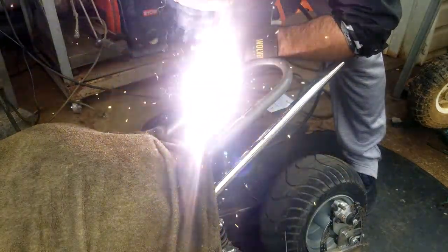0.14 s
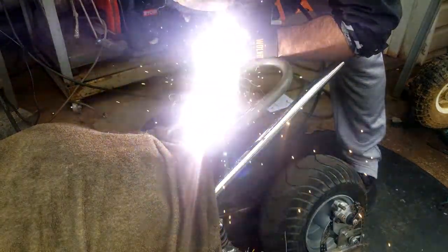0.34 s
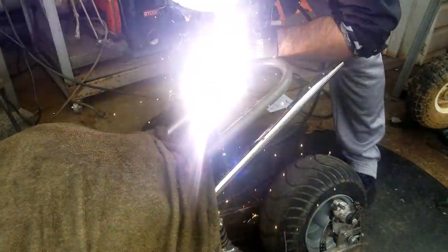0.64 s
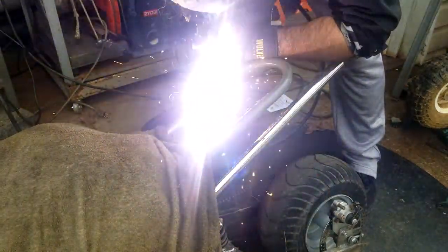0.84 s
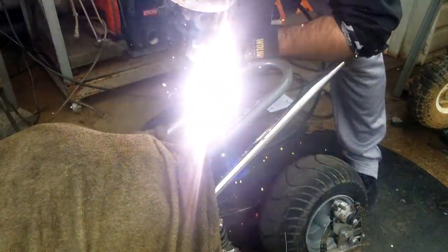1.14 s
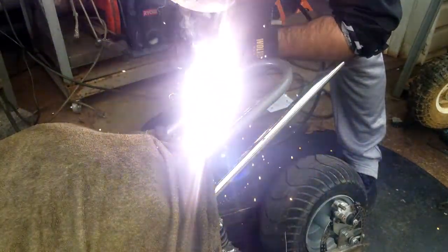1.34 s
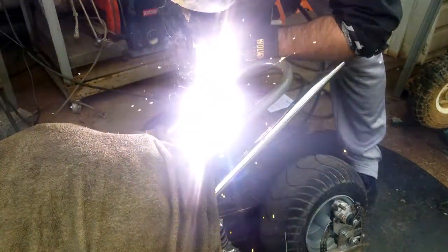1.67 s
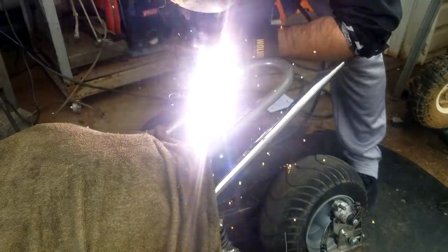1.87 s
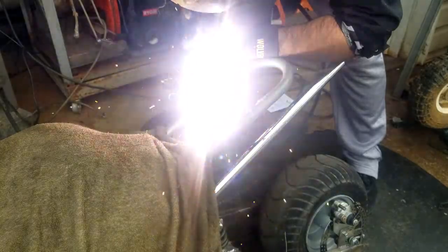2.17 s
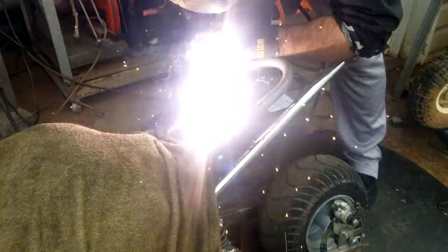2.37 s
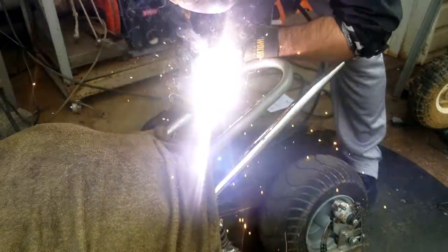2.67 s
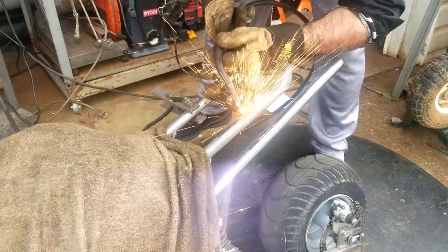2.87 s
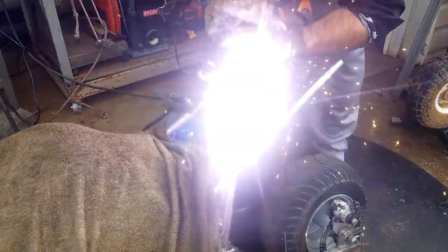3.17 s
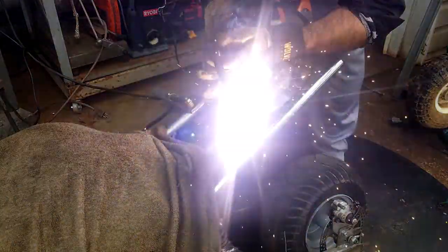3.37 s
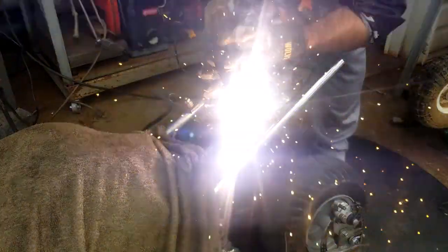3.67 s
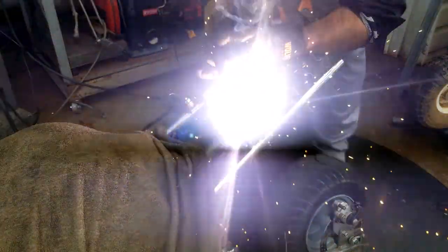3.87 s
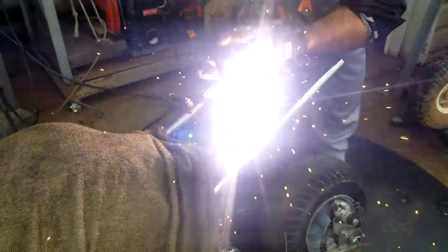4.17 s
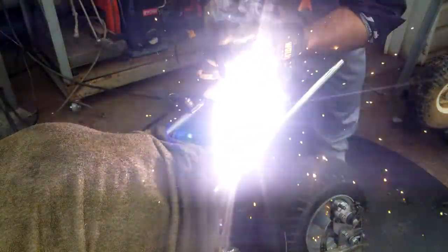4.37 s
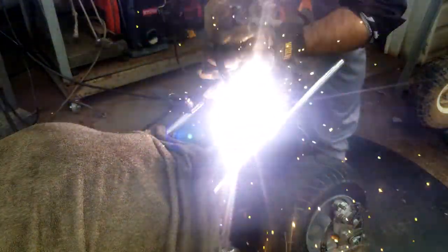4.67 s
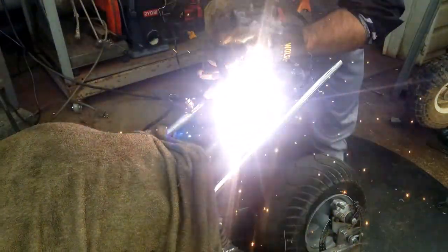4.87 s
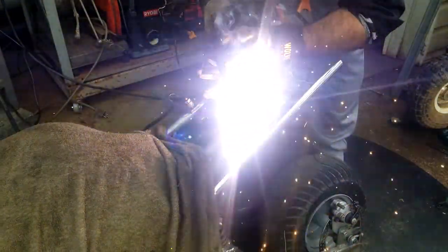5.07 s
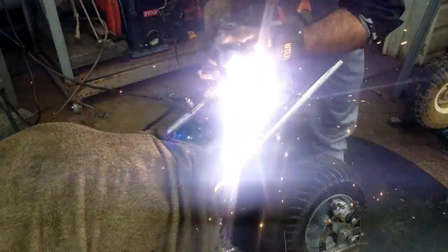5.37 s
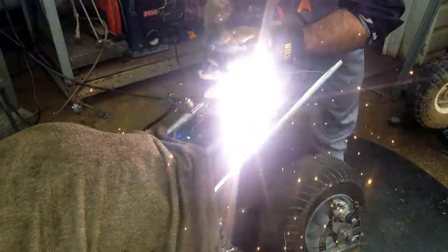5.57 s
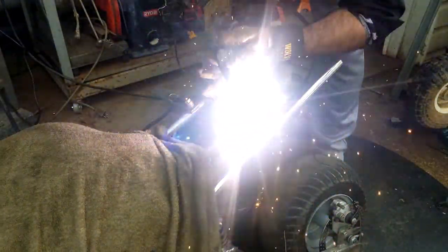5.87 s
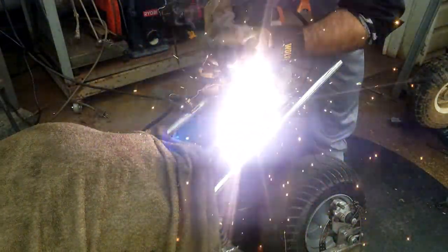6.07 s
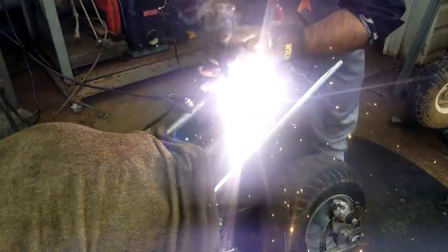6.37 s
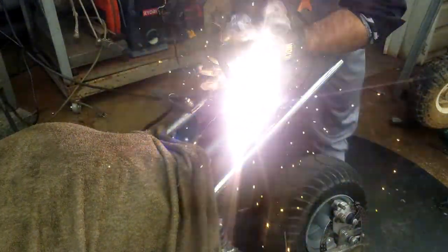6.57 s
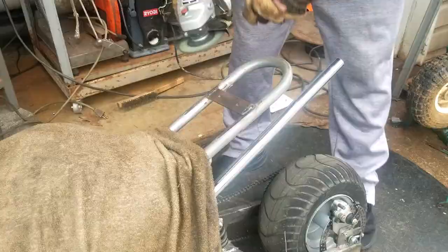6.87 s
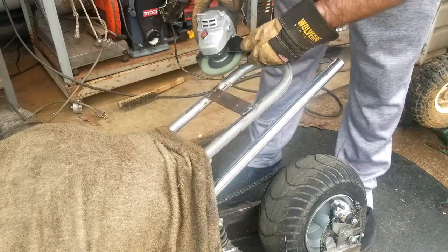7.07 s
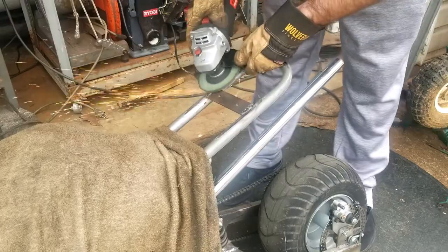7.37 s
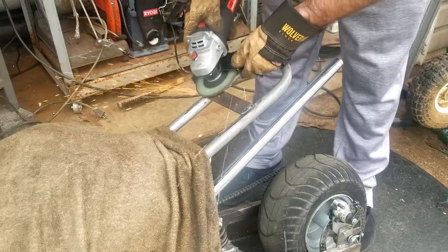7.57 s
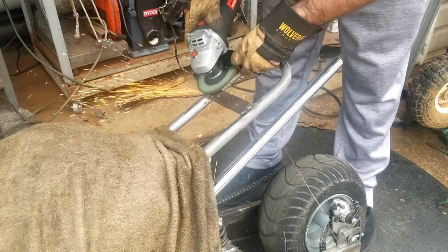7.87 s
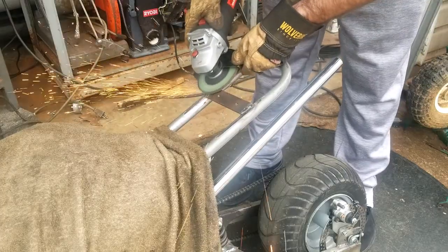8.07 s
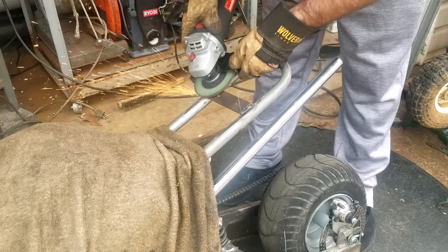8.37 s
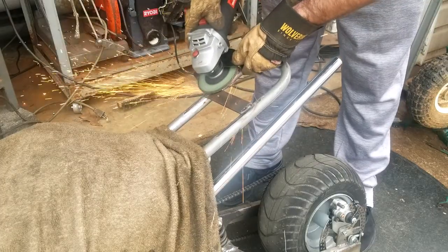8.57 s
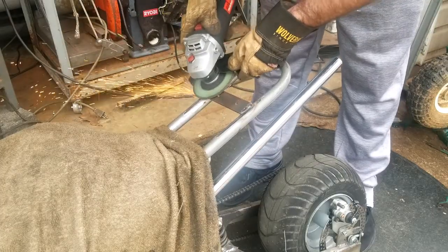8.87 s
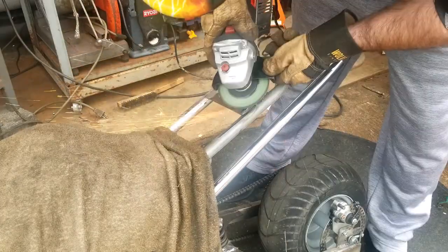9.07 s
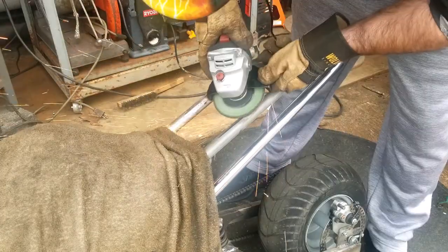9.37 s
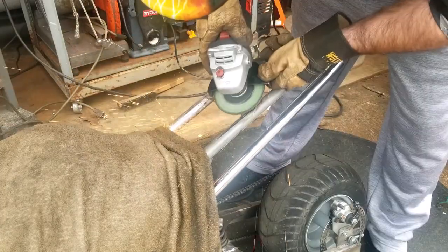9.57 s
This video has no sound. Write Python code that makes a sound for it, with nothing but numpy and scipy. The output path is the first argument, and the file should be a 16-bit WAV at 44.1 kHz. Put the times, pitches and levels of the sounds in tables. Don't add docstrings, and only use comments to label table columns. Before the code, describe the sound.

Crackling electric arc on steel tubing, flickering in level with bursting metal droplets and a faint cooling fan. The arc cuts out, dull knocks and hard snaps follow, and a second weld spits steadily. Then an angle grinder spins freely with a high whistle and motor whine, drops in pitch under load and grinds louder, gritty and metallic, in two passes. Small, fairly dry garage, close stereo pickup leaning left.

```python
import sys
import numpy as np
from scipy import signal
from scipy.fft import rfft, irfft
from scipy.io import wavfile
from scipy.ndimage import uniform_filter1d, minimum_filter1d

SR = 44100
rng = np.random.default_rng(int(sys.argv[2]) if len(sys.argv) > 2 else 0)


def magnitude_from_level(level_db):
    exponent = np.asarray(level_db, float) / 20
    return 10 ** exponent


def wrap_up_sound(samples):
    columns = np.atleast_2d(samples).T
    tamed = np.clip(columns, -1, 1)
    steps = np.round(tamed * 32767).astype(np.int16)
    wavfile.write(sys.argv[1], SR, steps)


N = 429534


def rms_one(x):
    return x / np.sqrt(np.mean(x ** 2) + 1e-20)


def in_time(rows):
    s, *columns = np.transpose(np.vstack(rows))
    return [np.interp(np.arange(N) / SR, s, column) for column in columns]


def peaks(rows):
    s = np.arange(N) / SR
    return sum(height * np.clip(1 - np.abs(s - at) / half_s, 0, 1) for at, height, half_s in rows)


def between(start, end, edge_s=0.0091):
    s = np.arange(N) / SR
    return np.clip(np.minimum(s - start, end - s) / edge_s + 0.5, 0, 1)


def drift(rate):
    low_pass = signal.butter(2, rate, fs=SR, output="sos")
    return rms_one(signal.sosfilt(low_pass, rng.standard_normal(N)))


def evened(x, span_s):
    return x / np.sqrt(uniform_filter1d(np.mean(x ** 2, axis=0), int(span_s * SR)) + 1e-12)


def colour(x, points, gain=magnitude_from_level):
    hz = np.maximum(np.fft.rfftfreq(x.shape[-1], 1 / SR), 1)
    points_hz, values = np.array(points)[:, 0], np.array(points)[:, 1]
    curve = np.interp(np.log(hz), np.log(points_hz), values)
    return irfft(rfft(x) * gain(curve), x.shape[-1])


def resonance(x, hz, width_hz):
    r = np.exp(-np.pi * width_hz / SR)
    top = np.array([1, 0, -1]) * (1 - r * r) / 2
    return signal.lfilter(top, [1, -2 * r * np.cos(2 * np.pi * hz / SR), r * r], x)


# pitch_hz, likeness (0-1)
EAR_LIKENESS = [(60, 0.14), (130, 1), (290, 0.34), (640, 0.43), (1410, 0.21), (3100, 0.41), (6820, 0.21),
                (15000, 0.12)]


def stereo_noise():
    mid, side = rng.standard_normal((2, N))
    mid = colour(mid, EAR_LIKENESS, lambda c: np.sqrt(1 + np.clip(c, 0, 1)))
    side = colour(side, EAR_LIKENESS, lambda c: np.sqrt(1 - np.clip(c, 0, 1)))
    return rms_one(np.array([mid + side, mid - side]))


def garage(clicks, right_db, near_db, far_db):
    lag = np.round(2.5 * drift(6)).astype(int)
    lagged = clicks[np.clip(np.arange(N) + lag, 0, N - 1)]
    out = np.array([clicks, magnitude_from_level(right_db) * lagged])
    for level_db, t60_s in [(near_db, 0.025), (far_db, 0.2)]:
        energy = signal.lfilter([1], [1, -magnitude_from_level(-120 / (t60_s * SR))], clicks ** 2 + 1e-18)
        out += magnitude_from_level(level_db) * np.sqrt(energy) * stereo_noise()
    return out


GRINDER_STARTS = [
    6.929,
    7.346,
    9.103,
    9.8,
]
# hum_db, air_db
FAN_LEVELS = [
    (-50.5, -50),
    (-59.5, -49),
]
# pitch_hz, level_db (per Hz)
FAN_AIR_COLOUR = [(18, -65), (30, -46), (134, 5.5), (156, -8.5), (194, -10), (245, -2), (355, -21),
                  (513, -2), (590, -6.5), (803, -3.5), (909, -6), (1030, -8), (1200, -54), (1560, -59),
                  (2640, -120)]
# pitch_hz, level_db (rms)
BLADE_TONES = [(478.5, -61.5), (524.3, -54.5), (1048.6, -60.5), (1573, -58.5), (2097.5, -61.5)]
# middle_s, level_db, half_length_s
HUM_SWELL = [
    (2.84, 6, 0.54),
]


def fan():
    s = np.arange(N) / SR
    welding = between(-1, GRINDER_STARTS[0], edge_s=0.06)
    hum_db, air_db = [
        welding * weld_db + (1 - welding) * grind_db + 1.5 * drift(1.0)
        for weld_db, grind_db in zip(*FAN_LEVELS)]
    boom = resonance(stereo_noise(), 144.3, width_hz=19.0)
    boom = rms_one(resonance(boom, 111, width_hz=105))
    air = rms_one(colour(stereo_noise(), FAN_AIR_COLOUR + [(1600, -70)]))
    tones = np.zeros(N)
    for hz, db in BLADE_TONES:
        level = magnitude_from_level(db + 1.5 + 2.5 * drift(25))
        tones += level * np.sin(2 * np.pi * hz * s + 0.5 * drift(1.36))
    out = magnitude_from_level(hum_db + peaks(HUM_SWELL)) * boom + magnitude_from_level(air_db - 0.5) * air
    return out + tones * between(-1, GRINDER_STARTS[0])


# start_s, level_db (peak), pitch_hz, t60_s
KNOCKS = [
    (2.84, -40.5, 145, 0.16),
    (2.906, -40, 320, 0.06),
    (3.09, -43, 135, 0.056),
    (3.301, -42, 244.2, 0.055),
    (4.797, -36.5, 143, 0.053),
    (6.758, -38.5, 176, 0.19),
    (6.79, -40, 201, 0.07),
    (7.327, -42, 345, 0.044),
]


def thumps():
    out = np.zeros(N)
    s = np.arange(int(0.3 * SR)) / SR
    for start, peak_db, hz, t60_s in KNOCKS:
        rattle = resonance(rng.standard_normal(len(s)), 270, width_hz=350) * 13.6
        knock = np.sin(2 * np.pi * hz * s) + 0.5 * rattle
        onset = 1 - np.exp(-s / 0.00028)
        out[int(start * SR):][:len(s)] += magnitude_from_level(peak_db - 60 * s / t60_s) * knock * onset
    return out


# start_s, level_db (peak)
WIRE_TOUCHES = [(2.9061, -9.5), (3.003, -18), (3.05, -15), (4.172, -25), (4.1764, -23.5), (4.1808, -19),
                (4.1847, -21), (4.189, -19), (4.1928, -22), (4.2, -25), (5.5673, -20)]


def strikes():
    out = np.zeros((2, N))
    s = np.arange(int(0.08 * SR)) / SR
    for start, peak_db in WIRE_TOUCHES:
        burst = 0.36 * rng.standard_normal((2, len(s))) * magnitude_from_level(-60 * s / 0.045)
        burst[:, 8:10] = [8, -5]
        out[:, int(start * SR):][:, :len(s)] += magnitude_from_level(peak_db) * burst
    return colour(out, [(300, 0.5), (1200, 4.3), (5000, 1.8), (8000, 1.7), (15000, 1.1)])


# start_s, end_s, crackle_db, body_db, low_body_db
ARC_BURNS = [
    (-0.5, 0.42, -27.5, -37, -43),
    (0.42, 2.0, -27.5, -37, -47.5),
    (2.0, 2.738, -27.5, -36, -44.5),
    (2.835, 2.84, -36, -41, -41),
    (2.89, 2.93, -38, -33.5, -40),
    (2.991, 3.04, -37, -31.5, -38.5),
    (3.048, 6.92, -30.5, -30.5, -44.5),
]
# deepest_s, level_db, half_length_s
ARC_FALTERS = [(0.088, -5, 0.096), (0.18, 0, 0.064), (0.448, -5, 0.078), (0.532, -5, 0.054),
               (0.677, -8, 0.012), (0.712, -6.5, 0.088), (1.0, -3.5, 0.14), (1.072, 0, 0.036),
               (1.155, -7.5, 0.029), (1.335, -10, 0.045), (1.375, -5.5, 0.023), (1.576, -7.5, 0.093),
               (1.768, -4, 0.099), (2.008, -4.5, 0.18), (2.128, -3.5, 0.062), (2.27, -2.5, 0.1),
               (2.384, -8, 0.065), (2.59, -4.5, 0.13), (3.72, -2, 0.2), (3.944, -6.5, 0.059),
               (4.108, -8.5, 0.063), (4.268, -7.5, 0.096), (4.456, -9.5, 0.065), (4.872, -2.5, 0.2),
               (5.12, 0.5, 0.084), (5.3, -2, 0.41), (5.6, -3.5, 0.14), (5.924, -2.5, 0.22),
               (6.212, -4.5, 0.12), (6.452, -3, 0.2), (6.812, -7, 0.076)]


def burning():
    s = np.arange(N) / SR
    out = np.array([-59, -61, -48])[:, None] * np.ones(N)
    lights_s, dies_db_per_s = 0.003, 750
    for start, end, *levels_db in ARC_BURNS:
        loss_db = 40 * np.clip((start - s) / lights_s, 0, None)
        loss_db += dies_db_per_s * np.clip(s - end, 0, None)
        out = np.maximum(out, np.array(levels_db)[:, None] - loss_db)
    falter_share = np.array([[1], [0.96], [0.29]])
    return out + falter_share * peaks(ARC_FALTERS)


def arc_sizzle():
    ripple_hz, shorts_per_s = 240, 1100
    ripple = 1 + 0.56 * np.cos(2 * np.pi * ripple_hz * np.arange(N) / SR + 1.2 * drift(4))
    rate_db = 1.7 * peaks(ARC_FALTERS) + 1.6 * drift(35)
    born = rng.random(N) < shorts_per_s * ripple ** 2 * magnitude_from_level(rate_db) / SR
    sizes = magnitude_from_level(4.2 * np.minimum(rng.exponential(1, N), 2.8)) * rng.choice([-1, 1], N)
    snaps = garage(born * sizes, right_db=-9, near_db=-28, far_db=-35)
    sizzle = evened(rms_one(snaps) + magnitude_from_level(-13.5) * stereo_noise(), span_s=0.081)
    return sizzle * between(-1, GRINDER_STARTS[0])


def floor_echo(x):
    lag = round(SR / 870.0)
    return x - 0.35 * np.pad(x, ((0, 0), (lag, 0)))[:, :N]


# start_s, level_db, t60_s
FIRST_SPIT = (2.835, -22, 0.037)


def spatter(s, peak_db, crackle_db):
    usual_crackle_db = ARC_BURNS[0][2]
    small_pops = rng.random(N) < 3 / SR
    clicks = small_pops * magnitude_from_level(-17 + 16.0 + crackle_db - usual_crackle_db)
    clicks *= between(-1, GRINDER_STARTS[0])
    burst_s, smear_s = 0.001, 0.0025
    clicks[((s + burst_s) * SR).astype(int)] = magnitude_from_level(np.minimum(peak_db, -3) + 8.0)
    out = garage(clicks, right_db=-7, near_db=-28, far_db=-46)
    half_smear = int(smear_s * SR / 2)
    blur = uniform_filter1d(uniform_filter1d(clicks ** 2, half_smear), half_smear)
    out += magnitude_from_level([[-2.5], [-11.5]]) * np.sqrt(np.maximum(blur, 0)) * stereo_noise()
    spit_s, spit_db, t60_s = FIRST_SPIT
    since = np.arange(N) / SR - spit_s
    fading_db = -60 * np.clip(since - 0.004, 0, 1) / t60_s
    return out + (since > 0) * magnitude_from_level(spit_db + 6 + fading_db) * stereo_noise()


def droplet_hush(s):
    span = int(0.007 * SR)
    bridged = np.zeros(N)
    bridged[(s * SR).astype(int) - span // 2 - 20] = span
    return magnitude_from_level(-3 * np.clip(uniform_filter1d(bridged, span), 0, 1))


# start_s, level_db (peak)
POPS_FIRST_WELD = [(0.1393, -9), (0.177, -15), (0.1855, -14), (0.2638, -12), (0.4733, -12), (0.5402, -18),
                   (0.5604, -11), (0.6846, -9), (0.714, -10.5), (0.7434, -9), (0.7662, -11), (0.8066, -18),
                   (0.8155, -15), (0.9163, -15), (0.9393, -10.5), (0.9825, -9.5), (1.0311, -10),
                   (1.0824, -13), (1.1029, -6), (1.171, -13.5), (1.1823, -13), (1.1897, -14), (1.3201, -3),
                   (1.3485, -9.5), (1.3745, -8), (1.3902, -7), (1.4398, -8), (1.516, -14), (1.5249, -11.5),
                   (1.5678, -11), (1.6043, -26), (1.6043, -12), (1.6303, -8), (1.6611, -8), (1.7784, -16),
                   (1.7883, -15), (1.8347, -14.5), (1.9584, -13), (2.0532, -10), (2.14, -14), (2.154, -13),
                   (2.1794, -12), (2.2373, -13.5), (2.277, -7), (2.31, -10.5), (2.5646, -9), (2.6359, -21),
                   (2.6589, -18.5)]
# start_s, level_db (peak)
POPS_STUTTER = [(2.8353, -12), (2.8906, -9), (2.893, -9), (2.918, -6), (2.9929, -11), (3.0025, 2),
                (3.01, -5), (3.024, -14), (3.041, -17), (3.0493, -3), (3.078, -15), (3.081, -15),
                (3.0967, -4), (3.113, -10), (3.1161, -8)]
# start_s, level_db (peak)
POPS_SECOND_WELD = [(3.1163, -8), (3.1637, -17), (3.1867, -11), (3.252, -7), (3.4296, -6), (3.4559, -6),
                    (3.5323, -10), (3.5494, -8), (3.5836, -9), (3.7155, -10), (3.7589, -11), (3.776, -11),
                    (3.8322, -15), (3.8636, -7), (3.951, -16), (3.9709, -13), (4.0795, -8), (4.1041, -9),
                    (4.1201, -8), (4.137, -13), (4.1565, -13), (4.1723, -5.5), (4.179, -13), (4.24, -10),
                    (4.2742, -20), (4.2926, -12.5), (4.3131, -8), (4.3535, -10.5), (4.4222, -5),
                    (4.4413, -16), (4.4588, -16), (4.4877, -10), (4.5162, -12), (4.571, -11), (4.7401, -13),
                    (4.7545, -7), (4.917, -7), (4.964, -9), (4.9841, -13),
                    (4.9844, -11.5), (5.0288, -14), (5.0536, -11.5), (5.0742, -9), (5.1425, -16),
                 (5.147, -8.5), (5.195, -10), (5.2478, -9), (5.3001, -14), (5.38, -8), (5.4174, -4),
                 (5.452, -15), (5.4643, -12), (5.508, -12), (5.5321, -10.5), (5.567, -6), (5.6214, -16.5),
                 (5.6597, -12), (5.7157, -3), (5.7545, -8), (5.822, -9), (5.9367, -10), (5.9946, -7),
                 (6.031, -6), (6.0689, -14), (6.1118, -10), (6.239, -4), (6.3083, -8), (6.3937, -14),
                 (6.416, -10), (6.463, -12), (6.4913, -10), (6.5368, -11), (6.6132, -10), (6.6695, -17),
                 (6.7698, -6), (6.8277, -15), (6.8456, -13), (6.8624, -10.5)]
# pitch_hz, level_db (per Hz)
CRACKLE_COLOUR = [(4470, -16), (7600, -30), (8320, -8.5), (10100, 2.5), (15500, 5.5), (15900, -12)]
BODY_COLOUR = [(2000, -113), (3400, -6), (4020, -5.5), (4230, -1.5), (4530, -0.5), (4930, 4), (7670, 5),
               (8400, 9.5), (10900, 3.5), (18500, -120)]
LOW_BODY_COLOUR = [(530, -14), (900, -12.5), (1390, 2.5), (1590, 3), (1780, 0.5), (2140, -3), (2730, 2),
                   (3170, -5), (3530, -1.5), (3800, -16), (4940, -9), (8360, -120)]
# middle_s, level_db, half_length_s
HAND_SHADE = [
    (1.1, -1, 0.82),
]
# middle_s, fade_out_s, fade_in_s, level_db (at the bottom)
SCENE_CHANGES = [
    (2.769, 0.029, 0.036, -28),
    (6.934, 0.037, 0.033, -35),
    (9.103, 0.031, 0.027, -33),
]


def arc():
    crackle_db, body_db, low_db = burning()
    sizzle = arc_sizzle()
    out = magnitude_from_level(crackle_db - 0.5) * rms_one(colour(sizzle, CRACKLE_COLOUR))
    out += magnitude_from_level(body_db) * rms_one(colour(sizzle + 0.64 * stereo_noise(), BODY_COLOUR))
    out += magnitude_from_level(low_db) * rms_one(floor_echo(colour(sizzle + 1.0 * stereo_noise(), LOW_BODY_COLOUR)))
    pops = POPS_FIRST_WELD + POPS_STUTTER + POPS_SECOND_WELD
    s, peak_db = np.transpose(pops)
    spitting = spatter(s, peak_db, crackle_db)
    out *= droplet_hush(s)
    bright = [(1000, -55.5), (2500, -18), (4000, -9.0), (7400, -7.5)] + CRACKLE_COLOUR[2:]
    droplets = colour(spitting, bright)
    middle = colour(spitting, [(2500, -40), (4300, -6), (7500, 0), (8500, -30)])
    droplets += magnitude_from_level(-12.5) * between(SCENE_CHANGES[0][0], GRINDER_STARTS[0]) * middle
    shade = magnitude_from_level(np.outer([0, 1], peaks(HAND_SHADE)))
    return (out * between(-1, GRINDER_STARTS[0]) + droplets) * shade


GEAR = 3.09
# cycles_per_wheel_turn, level_db (re whine)
ROTOR_TONES = [
    (1, -20),
    (2, -24),
    (3.09, 0),
    (6.18, -17),
]


def motor_whine(whine_hz):
    s = np.arange(N) / SR
    turn = 2 * np.pi * np.cumsum(uniform_filter1d(whine_hz, size=5000) / GEAR) / SR
    jitter = 0.03 + 0.12 * (s > GRINDER_STARTS[1])
    out = np.zeros(N)
    for order, db in ROTOR_TONES:
        level = magnitude_from_level(db + 1.5 * order ** -0.5 * drift(8))
        out += level * np.sin(order * (turn + jitter * drift(15)) + order)
    return out


# start_s, pitch_hz, level_db
FAN_WHISTLE = [
    (6.95, 12550, -37),
    (7.05, 11900, -39),
    (7.1, 11650, -37),
    (7.2, 11150, -34),
    (7.3, 10900, -35),
    (7.33, 10880, -70),
]


def fan_whistle():
    whistle_hz, whistle_db = in_time(FAN_WHISTLE)
    phase = 2 * np.pi * np.cumsum(whistle_hz + 40 * drift(60)) / SR
    flutter = magnitude_from_level(3 * np.array([drift(25), drift(25)]))
    return magnitude_from_level(whistle_db) * np.sin(phase) * flutter


# start_s, pitch_hz, level_db
WHEEL_SKID = [
    (9.28, 1230, -70),
    (9.295, 1260, -41),
    (9.32, 1540, -39),
    (9.335, 1560, -42),
    (9.35, 1450, -70),
]
# start_s, pitch_hz, level_db
TUBE_CHIRP = [
    (7.655, 3440, -70),
    (7.67, 3430, -36),
    (7.69, 3390, -36),
    (7.71, 3380, -70),
]


def skid_and_chirp():
    out = np.zeros(N)
    for hz, db in map(in_time, [WHEEL_SKID, TUBE_CHIRP]):
        out += magnitude_from_level(db + 6.5 * drift(60)) * np.sin(2 * np.pi * np.cumsum(hz) / SR)
    return out


# start_s, pitch_hz
WHEEL_BEAT = [
    [(7.36, 326.2), (7.454, 310), (7.81, 272.7), (7.972, 262.3), (8.734, 254.4), (8.816, 263.3),
     (8.858, 259), (9.016, 258.5), (9.08, 264)],
    [(9.13, 257.1), (9.182, 260.1), (9.244, 252.5), (9.31, 256.1), (9.356, 251.2), (9.442, 253),
     (9.494, 247), (9.522, 250.7), (9.74, 250.4)],
]


def wheel_beats(whine_hz):
    s = np.arange(N) / SR
    beat_hz = np.where(s < GRINDER_STARTS[1], whine_hz / GEAR, in_time(WHEEL_BEAT)[0])
    return np.cumsum(beat_hz * (1 + 0.007 * drift(12))) / SR + 0.004 * drift(60)


# start_s, end_s, overtone (cycles per turn), level_db
TUBE_SQUEALS = [
    (7.375, 7.645, 9, -38),
    (7.66, 7.88, 10, -40),
]


def squeals(beats, ring_gain_db):
    out = np.zeros(N)
    for start, end, turns, db in TUBE_SQUEALS:
        level = magnitude_from_level(db + ring_gain_db + 2.7 * drift(20))
        out += between(start, end, edge_s=0.02) * level * np.sin(2 * np.pi * turns * beats)
    return out


def overtones(beats):
    swell, slip = drift(13.7), drift(9.7)
    out = np.zeros((2, N))
    for k in range(5, 31):
        level = magnitude_from_level(4 * np.roll(swell, 15000 * k))
        tone = level * np.cos(2 * np.pi * k * beats + 0.7 * np.roll(slip, 13000 * k))
        balance_db = np.roll(swell, 9000 * k)[::4410].repeat(4410)[:N]
        out += tone * magnitude_from_level(np.outer([1, -1], balance_db))
    return rms_one(out)


def wheel_knocks(beats):
    knocks = np.maximum(np.diff(np.floor(beats), prepend=0), 0) * magnitude_from_level(2.0 * drift(27))
    return rms_one(garage(knocks, right_db=3.0, near_db=-34, far_db=-62))


def grit_grains(beats):
    born = rng.random(N) < 5000 / SR
    sizes = magnitude_from_level(5.3 * np.minimum(rng.exponential(1, N), 4)) * rng.choice([-1, 1], N)
    grains = born * sizes * (1 + 0.18 * np.cos(2 * np.pi * beats))
    return rms_one(garage(grains, right_db=-7, near_db=-46, far_db=-25))


def tube_ring(strike, modes):
    out = np.zeros((2, N))
    for k, (hz, width_hz, db) in enumerate(modes):
        ringing = resonance(resonance(strike, hz, 1.12 * width_hz), hz, 1.12 * width_hz)
        out += (-1) ** k * magnitude_from_level(db + 2.1 * drift(16.4)) * ringing
    return out


# start_s, pitch_hz (whine), level_db
MOTOR_SPEED = [
    (6.95, 965, -36.5),
    (7.166, 992, -35.5),
    (7.39, 1012, -41.5),
    (7.42, 968.3, -42),
    (7.9, 814, -52),
    (8.45, 808, -54.5),
    (8.604, 787, -55),
    (8.968, 801, -52.5),
    (9.462, 778, -52.5),
    (9.74, 771.6, -51),
]
# pitch_hz, level_db (per Hz)
AIR_COLOURS = [[(200, -19), (450, -23), (700, -9.0), (1100, -14.0), (1300, -4.5), (2150, -7.0),
               (2700, -6.0), (4500, 0.0), (8000, 0.0), (9500, -10.5)]] + 2 * [ [(200, -17.0), (400, -24.5),
               (800, -18.0), (1100, -14.5), (1600, -10.0), (2150, -15), (2500, -4.5), (3100, -5.5),
               (3700, -6.5), (6000, -3.0), (7500, -8.0), (9000, -6.5)]]
# pitch_hz, level_db (per Hz)
GRIT_COLOURS = [
    [(4470, -31), (7600, -5), (10100, 0.5), (11300, 1), (12800, -1), (15500, -4), (15900, -6)],
    [(4470, -61), (7600, 1), (8300, 11), (9390, 12), (14400, 13), (15500, 12.5), (15900, -5)],
    [(4470, -38), (7600, 0), (7950, -1.5), (9480, 6), (10100, 2), (15500, -2), (15900, -8)],
]
# pitch_hz, width_hz, level_db
TUBE_MODES = [
    [(2690, 400, 3), (3550, 140, -2)],
    [(1635, 610, -13.5), (2700, 220, 5.5), (2863, 180, 1.5), (3440, 480, 0.5), (4430, 260, -25),
     (5510, 750, 2.5)],
    [(1600, 310, -15), (2520, 165, 5), (2795, 110, -6), (3020, 360, 1), (3490, 310, 0.5), (4420, 870, -3),
     (5650, 83, 4), (6900, 250, -0.5), (9150, 320, -22)],
]
# grit_db, ring_db, air_db
RESTING_LEVELS = [
    (-24, -37, -27),
    (-23.5, -35.5, -27),
    (-24, -32.5, -25.5),
]
# middle_s, level_db (ring), half_length_s, grit_share
WHEEL_PUSHES = [(7.372, 5.5, 0.057, 1.3), (7.47, 4, 0.04, 0.4), (7.66, 3, 0.17, 0.9),
                (7.819, 5.5, 0.042, .8), (8.15, 3.5, 0.13, 0.5), (8.333, 5, 0.039, 0.35),
                (8.656, 5.5, 0.18, 0.31), (8.853, 4.5, 0.063, 0), (8.97, 5, 0.061, 0.8),
                (9.168, 2, 0.097, 0), (9.247, 3.5, 0.047, 0.3), (9.354, 9, 0.071, 0.28),
                (9.474, 12, 0.077, 0.37), (9.556, 12, 0.04, 0.2), (9.606, 10.5, 0.023, 0.34),
                (9.69, 7, 0.096, 0.38)]


def grinder():
    whine_hz, whine_db = in_time(MOTOR_SPEED)
    ring_gain_db = peaks([row[:3] for row in WHEEL_PUSHES])
    grit_gain_db = peaks([(at, db * share, half_s) for at, db, half_s, share in WHEEL_PUSHES])
    grit_gain_db *= between(GRINDER_STARTS[1], GRINDER_STARTS[-1])
    slowing_db = 6.5 * np.log2(whine_hz / whine_hz.max())
    beats = wheel_beats(whine_hz)
    out = magnitude_from_level(whine_db + 5) * motor_whine(whine_hz) + fan_whistle()
    out += skid_and_chirp() + squeals(beats, ring_gain_db)
    knocks, singing, grains = wheel_knocks(beats), overtones(beats), grit_grains(beats)
    loads = [0.05, 1.3, 2.4]
    stages = zip(GRINDER_STARTS, GRINDER_STARTS[1:], AIR_COLOURS, GRIT_COLOURS, TUBE_MODES,
                 loads, RESTING_LEVELS)
    for start, end, air, grit, modes, load, (grit_db, ring_db, air_db) in stages:
        ring = rms_one(tube_ring(load * singing + stereo_noise(), modes))
        gritty = grains + 0.074 * load * magnitude_from_level(ring_gain_db / 2) * knocks
        hiss = rms_one(colour(gritty, grit) * magnitude_from_level(1.1 * drift(28)))
        rush = rms_one(colour(stereo_noise() + 0.17 * load * singing, air))
        stage = magnitude_from_level(grit_db + grit_gain_db) * hiss
        stage += magnitude_from_level(ring_db + ring_gain_db) * ring
        stage += magnitude_from_level(air_db + slowing_db + 4.0) * rush
        out += between(start, end) * stage
    return colour(out * between(GRINDER_STARTS[0], GRINDER_STARTS[-1]), [(110, -30), (230, 0)])


def hollowed(x, nulls):
    hz = np.fft.rfftfreq(N, 1 / SR)
    dips_db = sum(db * np.exp(-(2 * (hz - at_hz) / width_hz) ** 2) for at_hz, width_hz, db in nulls)
    return irfft(rfft(x) * magnitude_from_level(dips_db), N)


# pitch_hz, level_db
LEFT_OVER_RIGHT = [
    [(500, 1), (4000, 0), (7600, 1.5), (8300, 5.5), (12000, 2.5), (15500, 4)],
    [(500, 2), (4000, -1), (7600, -2.5), (8300, 0.5), (11000, 7), (15500, 0)],
    [(500, 3), (4000, 1.5), (7600, 0), (9000, 1), (12000, 4), (15500, 3)],
    [(500, 4), (4000, 3.5), (7600, 0), (9000, 4.5), (12000, 7), (15500, 11)],
    [(500, 3), (4000, 6), (7600, -0.5), (9000, 1.5), (12000, 5), (15500, 2)],
]
# pitch_hz, width_hz, level_db (depth)
WALL_NULLS = [
    [(692, 78, -8), (944, 54, -4), (1177, 150, -8.5), (1348, 100, -8), (1870, 93, -8), (3900, 300, -1.5)],
    [(320, 120, -0.5), (892, 78, -4), (1880, 66, -0.5), (2250, 48, -4)],
    [(460, 110, -9), (730, 91, -7.5)],
    [(225, 49, -11), (434, 120, -4.5), (610, 174, -9), (2200, 120, -2), (2445, 83, -5), (3095, 290, -6.5),
     (3900, 150, -3.5)],
    [(218, 44, -2), (420, 170, -5), (630, 164, -17), (2140, 190, -2), (3220, 110, -3), (3700, 99, -3)],
]


def scene():
    sound = fan() + thumps() + strikes() + arc() + grinder()
    out = np.zeros((2, N))
    starts = [-1, SCENE_CHANGES[0][0]] + GRINDER_STARTS
    for start, end, facing, nulls in zip(starts, starts[1:], LEFT_OVER_RIGHT, WALL_NULLS):
        left = colour(sound[0], facing, lambda db: 2 / (1 + magnitude_from_level(-db)))
        right = colour(sound[1], facing, lambda db: 2 / (1 + magnitude_from_level(db)))
        out += between(start, end) * hollowed(np.array([left, right]), nulls)
    return out


def drop_weak_bands(x):
    hz, _, cells = signal.stft(x, SR, nperseg=2048)
    lines = np.sum(np.abs(cells) ** 2, axis=0) + 1e-16
    power = uniform_filter1d(uniform_filter1d(lines, size=7, axis=0), size=2, axis=1)
    around = np.exp(uniform_filter1d(np.log(power), size=61, axis=0))
    treble = power[(hz > 9000) & (hz < 15000)].mean(axis=0)
    masked = np.clip(treble / around, 1, 30) ** 0.2
    luck = magnitude_from_level(5.5 * rng.standard_normal(power.shape))
    row, column = np.arange(len(hz)), np.arange(power.shape[1])
    block_row = np.where(hz < 2500, row // 6 * 6 + 3, row // 11 * 11 + 5)
    block = np.ix_(np.minimum(block_row, len(hz) - 1), column // 2 * 2)
    gain = np.clip((power * luck / around / masked / 0.36)[block] ** 8, 0.01, 1)
    bass = hz < 900
    bass_lines = uniform_filter1d(lines, size=3, axis=0)
    gain[bass] = np.clip((bass_lines / around / 0.5) ** 2, 0.1, 1)[bass]
    gain *= 1.15 * np.clip((lines / power / 0.85) ** 3, 0.03, 1)
    fast_db = 10 * np.log10(uniform_filter1d(np.diff(x[0], prepend=0) ** 2, size=200) + 1e-12)
    loudest_db = -minimum_filter1d(-fast_db, size=1800)
    jump_db = loudest_db - minimum_filter1d(fast_db, size=1800)
    gain[:, jump_db[np.minimum(column * 1024, N - 1)] > 24] = 0.75
    gain[(hz < 250) | (hz > 8000)] = 1
    gain[hz < 60] = np.array([[0], [0.1], [0.6]])
    return signal.istft(cells * gain, SR, nperseg=2048)[1][:, :N]


def roll_off(x):
    return signal.sosfilt(signal.butter(12, 17020, fs=SR, output="sos"), x)


def record(dry):
    s = np.arange(N) / SR
    for at, out_s, in_s, depth_db in SCENE_CHANGES:
        away = np.clip(np.where(s < at, (at - s) / out_s, (s - at) / in_s), 0, 1)
        dry = dry * magnitude_from_level(depth_db * (1 - away) ** 1.33)
    rounded = 0.83 * np.tanh(dry / 0.78)
    top_cut = signal.cheby2(14, 42, 16150, fs=SR, output="sos")
    mix = signal.sosfilt(top_cut, drop_weak_bands(rounded))
    return roll_off(mix)


dry = scene()
out = record(dry)
wrap_up_sound(out)
```